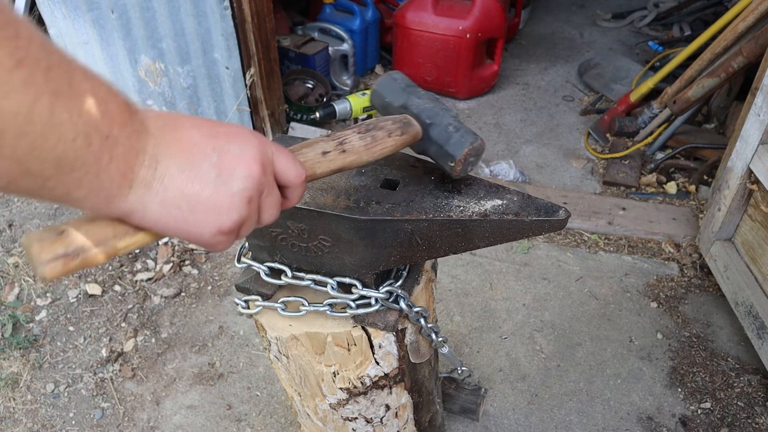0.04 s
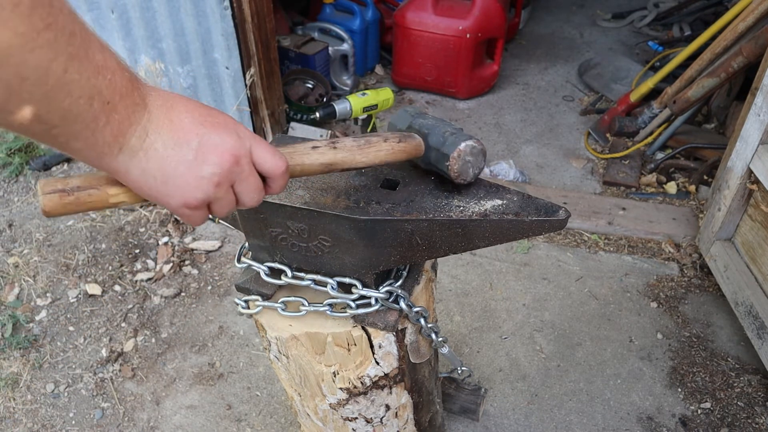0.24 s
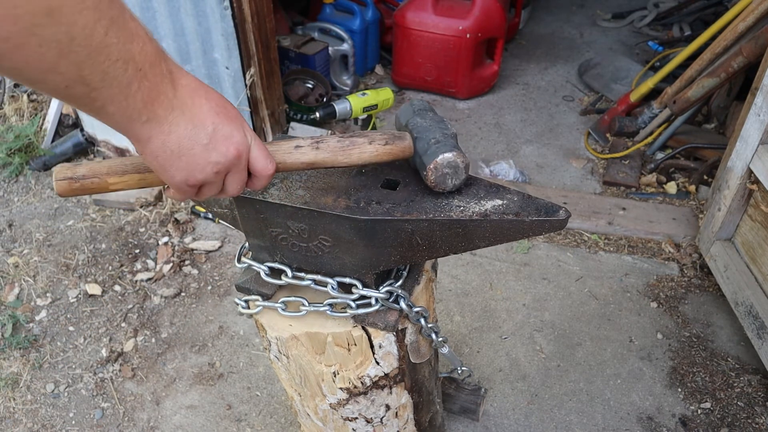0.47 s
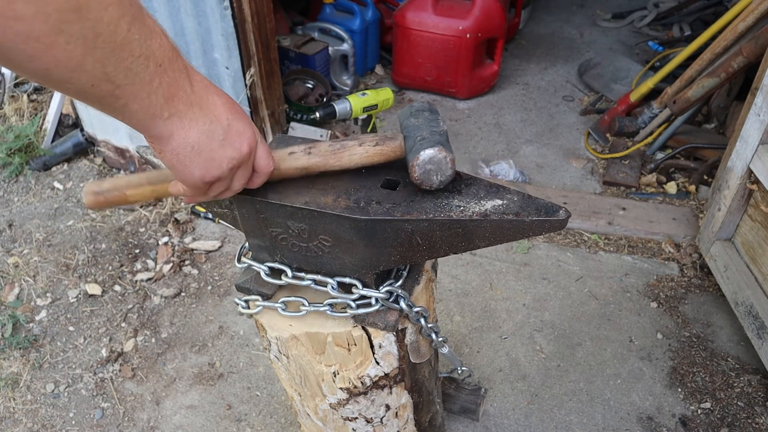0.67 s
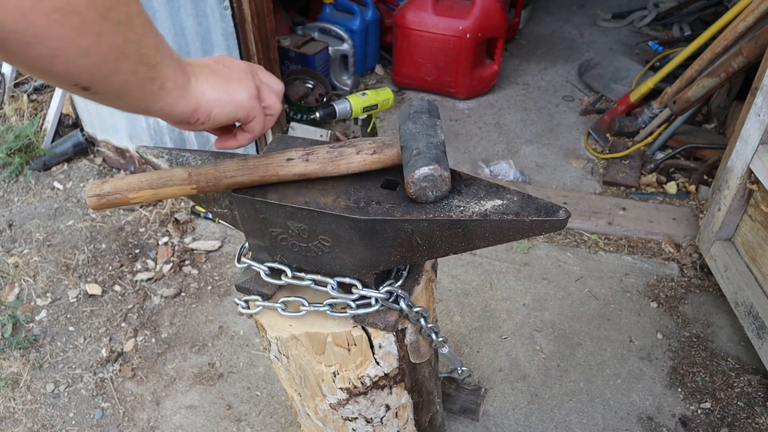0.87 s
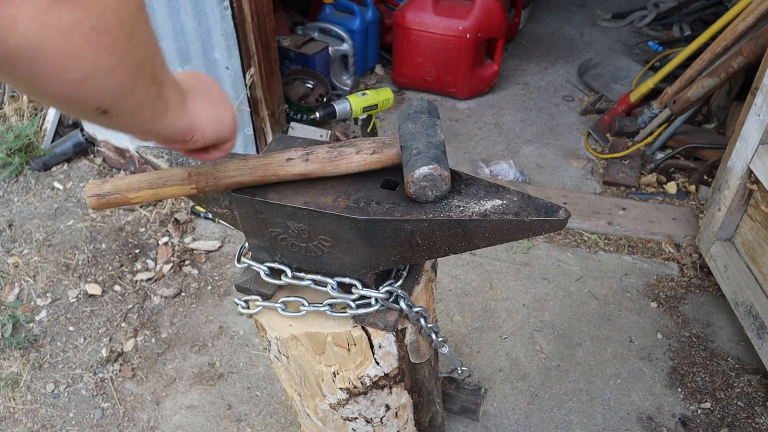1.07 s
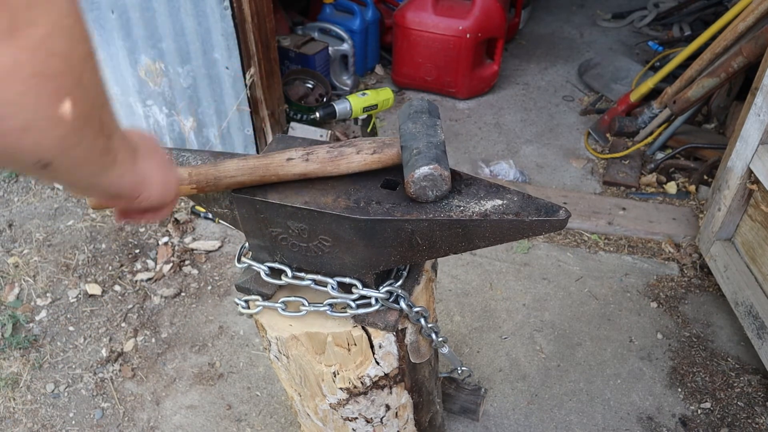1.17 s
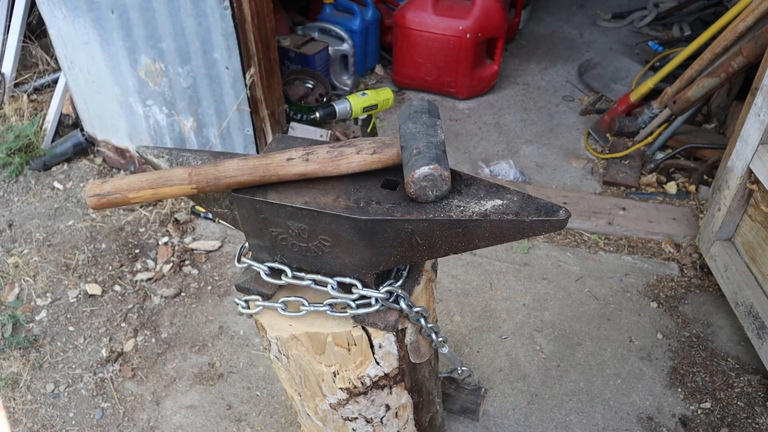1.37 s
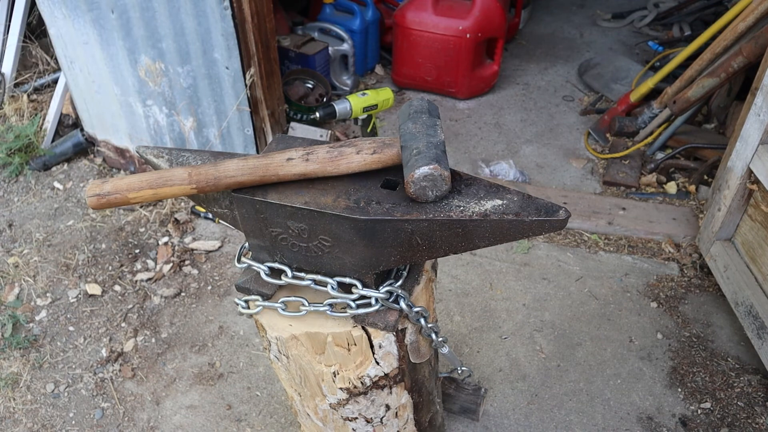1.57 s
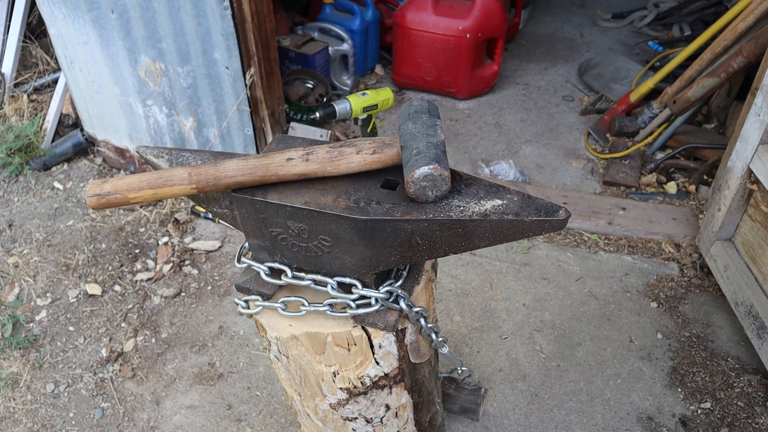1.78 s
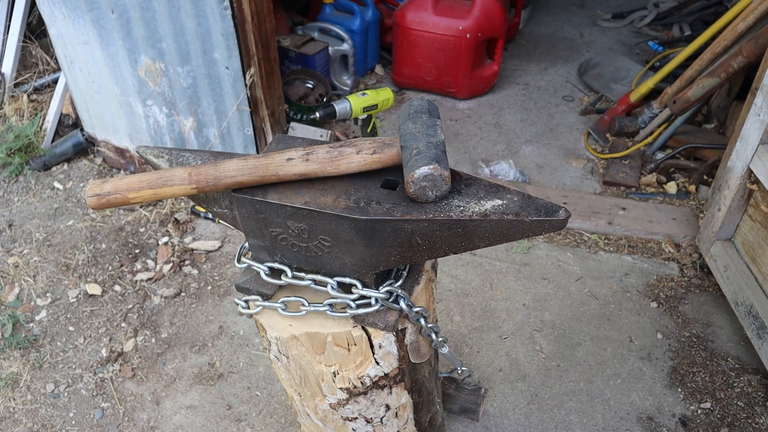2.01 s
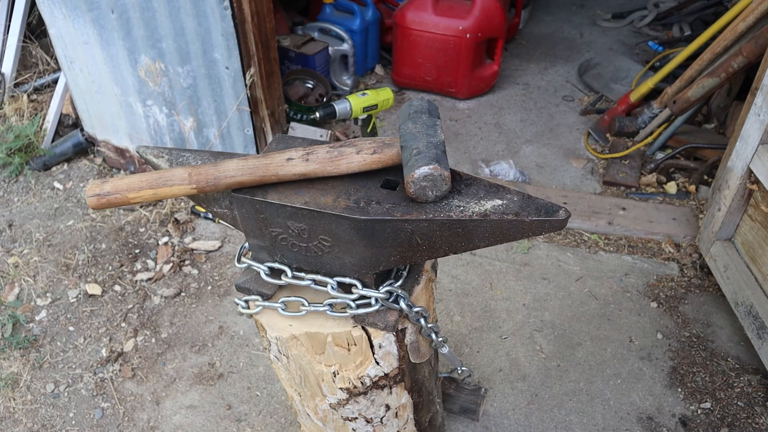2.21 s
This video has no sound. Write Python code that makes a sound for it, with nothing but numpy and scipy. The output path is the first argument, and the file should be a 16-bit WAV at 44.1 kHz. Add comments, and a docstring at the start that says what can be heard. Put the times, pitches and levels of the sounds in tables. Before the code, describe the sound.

Close to the stereo microphones, a heavy hammer clinks twice on an anvil, tips flat with a clack and rattles to rest as its wooden handle drops. Quiet shoe scuffs on small stones follow, over faint outdoor rumble and hiss.

```python
"""A sledge hammer set down on an anvil, on a stump outside a shed, heard close on a stereo pair.
The head lands on an edge with two ringing clinks, scrapes briefly, tips flat with a sharp clack and
rattles to rest as the handle drops: each contact knocks the wood, clacks the faces and rings the steel.
Then shoes shift on gritty ground, a little left of centre.
The shed and a far wall answer dully; faint outdoor rumble and hiss lie underneath."""
import sys
import numpy as np
from scipy import signal
from scipy.fft import rfft, irfft, next_fast_len
from scipy.io import wavfile

SR = 44100
rng = np.random.default_rng(int(sys.argv[2]) if len(sys.argv) > 2 else 0)


def wav_record(signal):
    """Record a signal, one row per channel, as 16-bit PCM in the file named by sys.argv[1]."""
    frames = np.transpose(np.atleast_2d(signal))
    bounded = np.clip(frames, -1, 1)
    # unit amplitude maps onto the largest positive 16-bit level
    quanta = np.round(bounded * 32767).astype(np.int16)
    wavfile.write(sys.argv[1], SR, quanta)


N = 99225
SIZE = 16384  # samples in a filter or response
TIME = np.arange(N) / SR
HZ = np.maximum(np.arange(SIZE // 2 + 1) * SR / SIZE, 1)

# Head and handle meeting the anvil: start_s, knock_db, clack_db, ring_db, ring_cutoff_hz,
# chatter_s, clack_decay_factor
CONTACTS = [(0.2156, 1, -8.5, 2, 2922, 0.000614, 0.57), (0.2736, 0, -22, -2, 1984, 0.00084, 1.22),
            (0.5453, -42, -28.5, -50.5, 15000, 0.00096, 0.13),
            (.7793, -18, 1.5, -34.5, 9700, 0.00029, 0.866), (0.8309, -14, -7.5, -28, 5630, 0.00084, 1.293),
            (0.8704, -7, -28.5, -39.5, 1294, 0.00266, 1.12),
            (.860, -24.5, -22.5, -45.5, 2600, 0.00163, 1.55),
            (.880, -13, -17.5, -38.5, 2324, 0.00166, 1.38), (.896, -29.5, -9, -44.5, 1864, 0.003, 0.846),
            (.902, -18, -12, -47, 1936, 0.0017, 0.563), (.922, -31.5, -27, -53, 2010, .002, 0.63),
            (0.948, -20, -29.5, -55, 487, 0.00156, 1), (.958, -24.5, -35.5, -45.5, 1820, 0.00183, 1.13)]
# Handle, anvil body and stump: pitch_hz, level_db, t60_s, pan_db (left minus right)
WOOD_MODES = [(85.73, -39, 0.356, -2), (301.3, -17, 0.0796, -3), (366.7, -18.5, 0.05, 1),
              (396.8, -9.5, 0.0613, -2.5), (439.4, -19, 0.0508, 1), (613.9, -27, 0.083, -8),
              (705.5, -17, 0.039, -4.5), (769.5, -20, 0.048, -5), (874, -24.5, 0.0615, -4),
              (1037.7, -28.5, 0.08, -2.5), (1437.5, -23, 0.0745, 1.5), (1563.7, -26, 0.066, -1),
              (2314, -19, 0.0475, -4.5)]
# Steel faces pressed together, heavily damped: pitch_hz, level_db, base_t60_s, pan_db
CLACK_MODES = [(1881.8, -16.5, .05, -5.5), (1980.6, -12, 0.0554, 1), (2079, -11.5, 0.061, -5.5),
               (2383.4, -12.5, 0.0682, -7), (2982, -23.5, .055, 3), (3116, -11, 0.039, -1),
               (3356, -9.5, 0.0457, 2), (3475, -13, .042, -1.5), (3977, -16, 0.06084, -3.5),
               (4586, -10, 0.043, -1.5), (4770, -17, 0.093, 3), (5830, -23.5, 0.04, -2.5),
               (6104, -23, .042, 1.5), (6290, -26, 0.057, 1.5)]
# Steel ringing freely, and its thin top overtones: pitch_hz, level_db, t60_s, pan_db
RING_MODES = [(2581.1, -10, 0.3323, -1), (3172, -37.5, 0.334, -3.5), (3703, -30.5, 0.12, -4.5),
              (5730, -26.5, .09, 2), (6940, -25, .1, 5), (8800, -41, 0.082, 7.5)]
SHIMMER_MODES = [(10490, -54, 0.59, 8.5), (11110, -46.5, 0.377, -2.5)]
# Two firm contacts that set off those overtones: start_s, level_db
SHIMMERS = [(0.215, -2), (0.8291, 1)]
# Quickly dying noise of the knock, the clack and the treble burst: frequency_hz, gain_db
KNOCK_SPECTRUM = [(60, -2.5), (150, 12), (260, 25), (400, 29), (520, 19), (720, 23.5), (1100, 13.5),
                  (1500, 17.5), (1950, 10.5), (2800, 18), (4000, 7.5), (8000, 14.5), (11500, 7.5),
                  (14000, -42)]
CLACK_SPECTRUM = [(80, -5.5), (350, 9.5), (900, 17.5), (1500, 17), (2100, 21), (3500, 20), (5800, 17),
                  (8300, 6.5), (11000, 10.5), (13500, -13.5)]
TREBLE_BURST_SPECTRUM = [(300, 3.5), (2000, 10), (4000, 20.5), (6300, 20.5), (8500, 2), (11000, 6),
                         (14500, 12), (17000, -1.5)]


def hammer():
    """Close to the microphones, each contact drives wood, pressed faces and free steel in its own mix."""
    wood = ringing(WOOD_MODES, attack_s=0.00084)
    wood += crack(KNOCK_SPECTRUM, t60_s=0.0577, direct_db=-0.5, scatter_db=-2)
    face_crack = crack(CLACK_SPECTRUM, t60_s=0.041, direct_db=-6, scatter_db=-4.5)
    ring = ringing(RING_MODES, attack_s=0.00058, size=SR // 2)
    shimmer = ringing(SHIMMER_MODES, attack_s=0.00058, size=SR // 2)
    wood_lag_s = 0.0008  # the wood gives a moment after the steel is touched
    out = np.zeros((2, N))
    for start_s, knock_db, clack_db, ring_db, ring_cutoff_hz, chatter_s, decay_factor in CONTACTS:
        blunt_hz = 1.273 * ring_cutoff_hz  # knock and clack are cut higher, but steeply
        faces = face_crack + ringing(CLACK_MODES, attack_s=0.00017, decay_factor=decay_factor)
        add(out, start_s + wood_lag_s, play(push(knock_db, blunt_hz, chatter_s, order=4), wood))
        add(out, start_s, play(push(clack_db, blunt_hz, order=4), faces))
        add(out, start_s, play(push(ring_db, ring_cutoff_hz), ring))
    for start_s, level_db in SHIMMERS:
        add(out, start_s, from_db(level_db) * shimmer)
    # A very short, bright burst of treble on the loudest clack, like overload crackle.
    treble_burst = crack(TREBLE_BURST_SPECTRUM, t60_s=0.0138, direct_db=-5, scatter_db=-3)
    add(out, start_s=0.7797, sound=treble_burst)
    return out


# Stones pressed underfoot: start_s, level_db, cutoff_hz, pitch_hz, tone_db
STONES = [(1.102, -21, 8820, 1200, -26), (1.227, -12.5, 4000, 2370, -23.5), (1.244, -12.5, 7600, 1150, -22),
          (1.421, -17, 6940, 2216, -14.5), (1.449, -9, 9910, 2535, -12), (1.475, -10, 6000, 817, -25.5),
          (1.4806, -1.5, 2170, 743, -16), (1.516, -6.5, 2400, 787, -16.5), (1.529, 2, 1580, 794, -27.5),
          (1.5646, -1.5, 4580, 2120, -18.5), (1.61, -12, 4870, 2223, -13.5), (1.668, -7, 2700, 1120, -19.5),
          (1.674, -13, 2630, 1074, -18.5), (1.814, -21, 12100, 1690, -18), (1.866, -23, 8000, 2380, -9.5),
          (1.893, -16.5, 12300, 2730, -20), (1.906, -15, 3000, 1544, -13.5),
          (1.999, -17.5, 2500, 1033, -13), (2.0044, -9, 3540, 1033, -17), (2.057, -10.5, 6370, 1970, -16.5),
          (2.061, -13, 5200, 2090, -18.5)]
# Colour of their clicks: frequency_hz, gain_db
STONE_SPECTRUM = [(130, -14), (300, 5.5), (600, 15), (1050, 12), (1600, 10), (2300, 9.5), (4000, 2),
                  (7000, 2), (11000, 6), (15000, -38.5)]


def stones():
    """Small stones click under the shoes beside the stump, each with its own pitch and spray of grit."""
    direct_db, spray_db, ring_cycles = -6, -1.5, 19
    clicks, tones, t = np.zeros((2, N)), np.zeros((2, N)), TIME[:SR // 10]
    direct = from_db(direct_db) * signal.unit_impulse(len(t))
    for start_s, level_db, cutoff_hz, pitch_hz, tone_db in STONES:
        force = push(level_db, cutoff_hz)
        spray = widen(rng.standard_normal((2, len(t)))) * decay(t, t60_s=0.0982)
        spray *= from_db(spray_db) / np.linalg.norm(spray[0])
        tone = from_db(tone_db) * np.cos(2 * np.pi * pitch_hz * t) * decay(t, ring_cycles / pitch_hz)
        add(clicks, start_s, play(force, direct + spray))
        add(tones, start_s, play(force, tone))
    return tones + colour(clicks, STONE_SPECTRUM)


# The head sliding on the anvil, then soles on the ground: peak_s, rise_s, fall_s, level_db
SLIDES = [(0.556, 0.0071, 0.0121, -44.5), (1.105, 0.0175, 0.0332, -48.5), (1.233, 0.0553, 0.0116, -45.5),
          (1.455, 0.0266, 0.047, -40.5), (1.55, 0.044, 0.0658, -39), (1.89, 0.1047, 0.043, -49.5),
          (2.059, 0.0805, 0.0778, -47.5)]


def slide_pressure():
    """The pressure of each slide swells and fades."""
    pressure = np.zeros(N)
    for peak_s, rise_s, fall_s, level_db in SLIDES:
        from_peak = np.maximum((peak_s - TIME) / rise_s, (TIME - peak_s) / fall_s)
        pressure += from_db(level_db) * np.exp(-from_peak ** 2 / 2)
    return pressure


# Colour of the rubbing grains: frequency_hz, gain_db
GRIT_SPECTRUM = [(150, -10.5), (450, -1), (750, 3.5), (1200, 4.5), (2400, 0), (4500, -11.5), (8000, -13.5),
                 (11000, -10), (15000, -34.5)]


def scuffs():
    """The head scrapes briefly on the anvil before tipping flat; later, soles scuff the grit."""
    grains_per_s, spread_db = 4000, 3.5
    sizes = from_db(spread_db * np.minimum(rng.exponential(1, (2, N)), 5))
    signs = rng.choice([-1, 1], (2, N))
    hits = rng.random((2, N)) < grains_per_s / SR
    grit = colour(widen(sizes * signs * hits), GRIT_SPECTRUM)
    return slide_pressure() * grit / grit.std()


# The grains that snap loudest: start_s, relative_db
LOUD_SNAPS = [(1.077, -22), (1.103, -19), (1.108, -21), (1.118, -12.5), (1.164, -23), (1.2455, -14),
              (1.454, -9.5), (1.471, -18.5), (1.4785, -15.5), (1.4806, -4), (1.5295, -6.5), (1.5455, -8.5),
              (1.5725, -11), (1.5885, -11), (1.815, -15), (1.82, -14), (1.866, -16.5), (1.878, -13.5),
              (1.893, -14.5), (1.898, -15.5), (1.9065, -12), (2.003, -16.5), (2.061, -10), (2.099, -18.5)]
# Colour of a breaking grain: frequency_hz, gain_db
SNAP_SPECTRUM = [(500, -11.5), (2000, -2.5), (3500, 0), (6500, -6), (9000, -1), (11300, -2.5),
                 (15000, -22.5)]


def grit_snaps():
    """Single grains break with bright ticks: some loud, and faint random ones that follow the pressure."""
    faint_per_s, faint_db, spread_db, pressure_share, trim_db = 120, -4.5, 3, 0.5056, -2
    shuffling = (TIME > 0.89) & (TIME < 2.4)
    breaks = (rng.random(N) < faint_per_s / SR) & shuffling
    pressure_db = 20 * np.log10(slide_pressure() + 1e-9)
    levels_db = faint_db + pressure_share * pressure_db + spread_db * rng.standard_normal(N)
    faint_snaps = list(zip(TIME[breaks], levels_db[breaks]))
    out, t = np.zeros((2, N)), TIME[:SR // 100]
    for start_s, relative_db in list(LOUD_SNAPS) + faint_snaps:
        tick = rng.standard_normal((2, len(t))) * decay(t, t60_s=0.0051)
        add(out, start_s, from_db(relative_db + trim_db) * unit_energy(tick))
    return colour(out, SNAP_SPECTRUM)


# The shed's dull answer: frequency_hz, gain_db
SHED_SPECTRUM = [(40, -16), (90, 7.5), (170, 5), (260, -11.5), (400, -19.5), (600, -20.5), (1500, -21),
                 (3000, -21), (6000, -23), (14000, -41.5)]


def shed(sound):
    """The open shed behind the anvil answers late and mostly in the bass."""
    tail = delayed(scatter(t60_s=0.346), delay_s=0.014)
    return play(sound.mean(axis=0), colour(tail, SHED_SPECTRUM))


def wall_echo(sound, cutoff_hz=452, level_db=-33.5):
    """One late, dull reflection reaches the microphones from across the yard."""
    dull = signal.sosfilt(signal.butter(2, cutoff_hz, fs=SR, output="sos"), sound + 1e-18)
    return from_db(level_db) * delayed(dull, delay_s=0.11)


# Outdoor ambience: frequency_hz, gain_db
AIR_SPECTRUM = [(12, -19), (25, -13.5), (55, -2.5), (85, -5), (115, -6.5), (170, -11), (240, -13),
                (500, -14.5), (1000, -18.5), (2200, -23), (4000, -27.5), (7000, -35), (9500, -27),
                (11300, -38), (13000, -59.5)]


def air(level_db=-46.5):
    """Steady rumble and hiss all around the microphones."""
    noise = colour(widen(rng.standard_normal((2, N))), AIR_SPECTRUM)
    return from_db(level_db) * noise / noise.std()


# Likeness of diffuse sound at the two microphones: frequency_hz, correlation
MIC_CORRELATION = [(30, 1), (120, 0.9625), (300, 0.715), (600, 0.2), (1500, -0.222), (3000, -0.473),
                   (6000, -0.1), (8500, -0.78), (12000, -0.687)]


def widen(pair):
    """Two unrelated signals become left and right: alike in the bass, partly opposed in the treble."""
    size = next_fast_len(pair.shape[1], True)
    mid, side = rfft(pair, size)
    alike = np.interp(np.arange(len(mid)) * SR / size, HZ, on_grid(MIC_CORRELATION))
    spectra = np.sqrt((1 + alike) / 2) * mid + np.sqrt((1 - alike) / 2) * side * [[1], [-1]]
    return irfft(spectra, size)[:, :pair.shape[1]]


def push(level_db, cutoff_hz, chatter_s=0, order=2):
    """The force of one contact: a push, rounded if soft, and perhaps a few milliseconds of chatter."""
    t = TIME[:SR // 25]
    force = signal.unit_impulse(len(t))
    if chatter_s:
        first_push_db, chatter_db = -0.5, -7.5
        chatter = rng.standard_normal(len(t)) * t * np.exp(-t / chatter_s)
        force = from_db(first_push_db) * force + from_db(chatter_db) * chatter / np.linalg.norm(chatter)
    return from_db(level_db) * signal.lfilter(*signal.butter(order, cutoff_hz, fs=SR), force + 1e-18)


def ringing(modes, attack_s, decay_factor=1, size=SIZE):
    """A struck body's modes: decaying sines of alternating sign, each leaning to one microphone."""
    t = TIME[:size]
    pitch_hz, level_db, t60_s, pan_db = np.transpose(modes)
    waves = np.sin(2 * np.pi * np.outer(pitch_hz, t)) * decay(t, decay_factor * t60_s[:, None])
    gains = (-1) ** np.arange(len(modes)) * from_db(level_db) * pan(pan_db)
    return gains @ waves * (1 - np.exp(-t / attack_s))


def crack(spectrum, t60_s, direct_db, scatter_db):
    """A sharp first wave followed by quickly dying scatter."""
    direct = from_db(direct_db) * signal.unit_impulse(SIZE)
    return colour(direct + from_db(scatter_db) * scatter(t60_s), spectrum)[:, :SIZE]


def scatter(t60_s, treble_hz=5791, treble_decay_factor=0.551):
    """Stereo noise that dies away, the treble first."""
    noise, t = widen(rng.standard_normal((2, SIZE))), TIME[:SIZE]
    low = signal.lfilter(*signal.butter(2, treble_hz, "low", fs=SR), noise)
    high = signal.lfilter(*signal.butter(2, treble_hz, "high", fs=SR), noise)
    return unit_energy(low * decay(t, t60_s) - high * decay(t, t60_s * treble_decay_factor))


def colour(sound, spectrum):
    """Minimum-phase filter with the given response."""
    cepstrum = irfft(np.log(from_db(on_grid(spectrum))))
    cepstrum[1:SIZE // 2] *= 2
    cepstrum[SIZE // 2 + 1:] = 0
    response = irfft(np.exp(rfft(cepstrum)))
    return play(sound, response[:SIZE // 4])


def on_grid(points):
    """Join points by lines on a log frequency axis."""
    hz, value = np.transpose(points)
    return np.interp(np.log(HZ), np.log(hz), value)


def play(force, response):
    """A force drives a response; one of them may be stereo."""
    return signal.oaconvolve(np.atleast_2d(force), np.atleast_2d(response), axes=1)[:, :N]


def add(out, start_s, sound):
    """Mix a sound into out at start_s."""
    part = out[:, int(start_s * SR):][:, :sound.shape[-1]]
    part += sound[..., :part.shape[1]]


def delayed(sound, delay_s):
    """The same stereo sound, arriving later."""
    return np.pad(sound, ((0, 0), (int(delay_s * SR), 0)))[:, :N]


def decay(t, t60_s):
    """A fall of 60 dB every t60_s."""
    return np.exp(-np.log(1000) * t / t60_s)


def unit_energy(pair):
    """Scale to an average energy of one per channel."""
    return pair / np.sqrt(np.sum(pair ** 2) / 2)


def pan(pan_db):
    """Two gains, the left pan_db above the right."""
    return from_db(pan_db * np.array([[.5], [-.5]]))


def from_db(db):
    """Decibels to gain."""
    return 10 ** (np.asarray(db) / 20)


def scene():
    """Hammer and feet in front of the shed, reaching the left microphone a little earlier."""
    right_lag_s, crunch_to_shed_db = 0.00008, -3.5
    blows = hammer()
    crunch = (stones() + scuffs() + grit_snaps()) * pan(pan_db=1.5)
    left, right = blows + crunch
    near = np.array([left, np.interp(TIME - right_lag_s, TIME, right)])
    return near + shed(blows + from_db(crunch_to_shed_db) * crunch) + wall_echo(blows) + air()


def record(dry):
    """The recorder clips peaks above full scale and cuts the very top."""
    stopband_hz = 17050
    lowpass = signal.cheby2(12, 70, stopband_hz, fs=SR, output="sos")
    return signal.sosfilt(lowpass, np.clip(dry, -1, 1))


dry = scene()
out = record(dry)
wav_record(out)
```